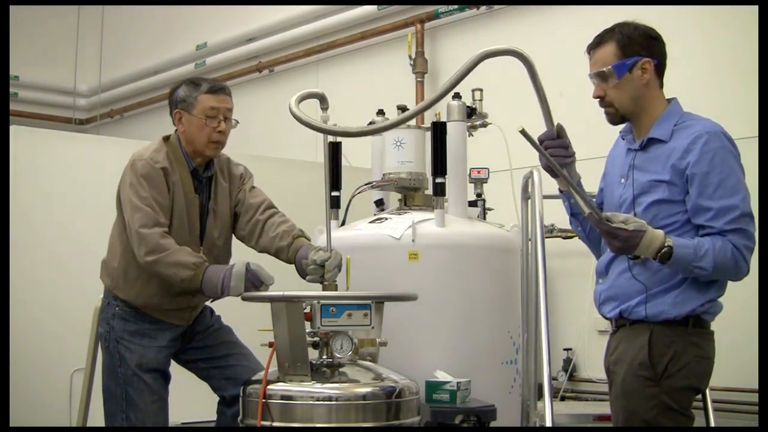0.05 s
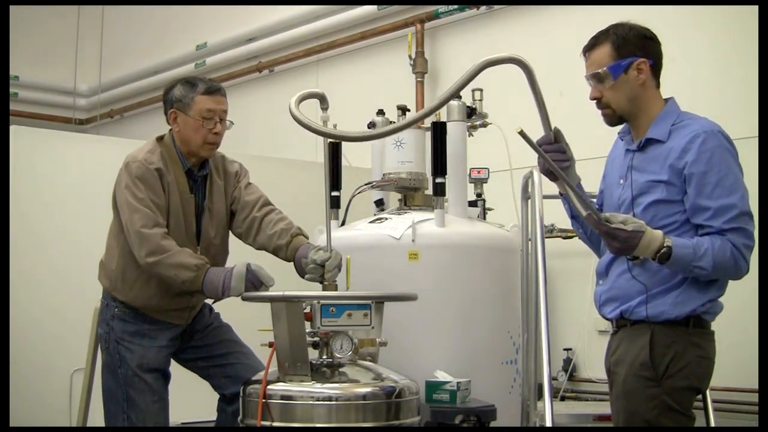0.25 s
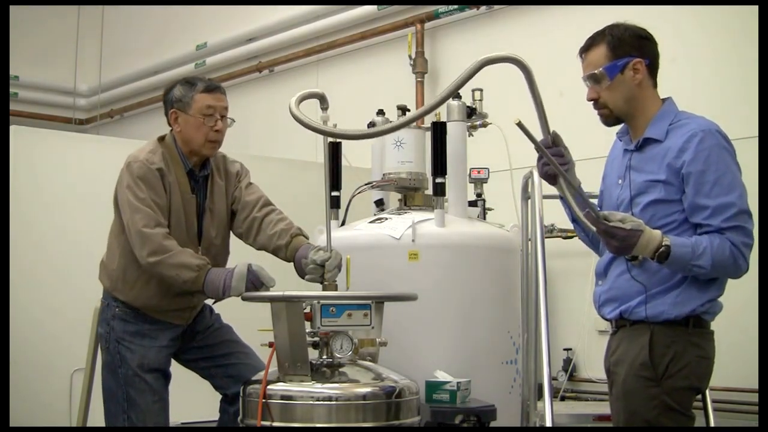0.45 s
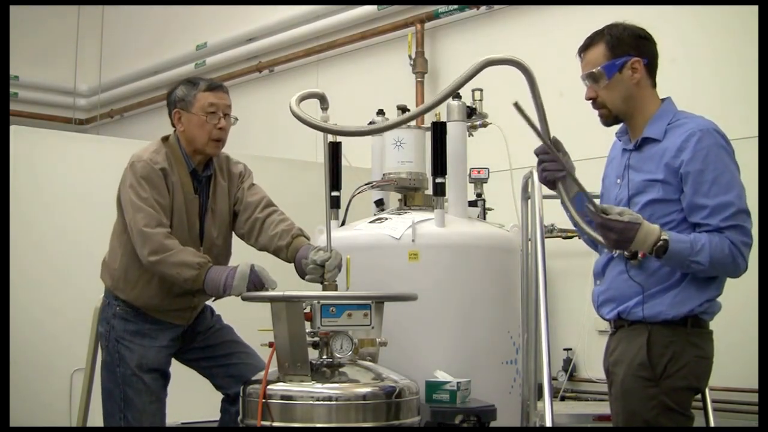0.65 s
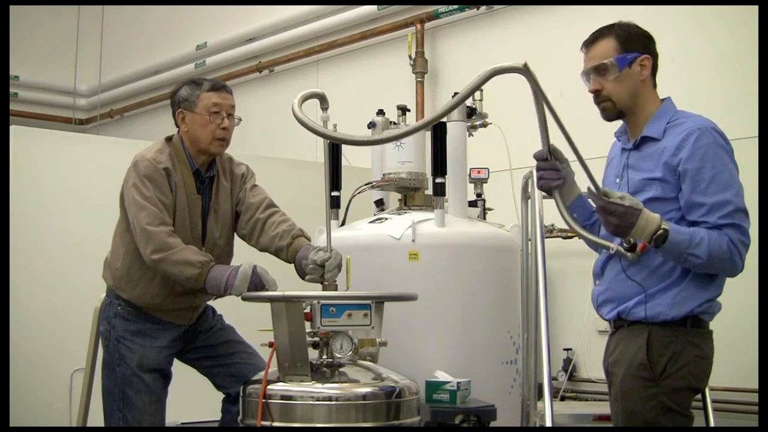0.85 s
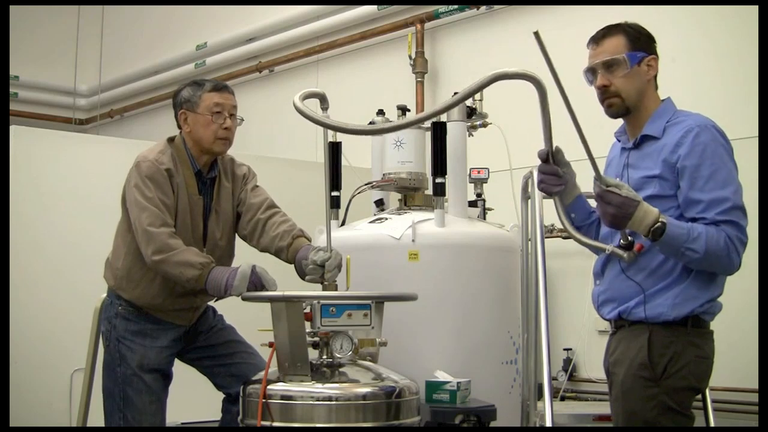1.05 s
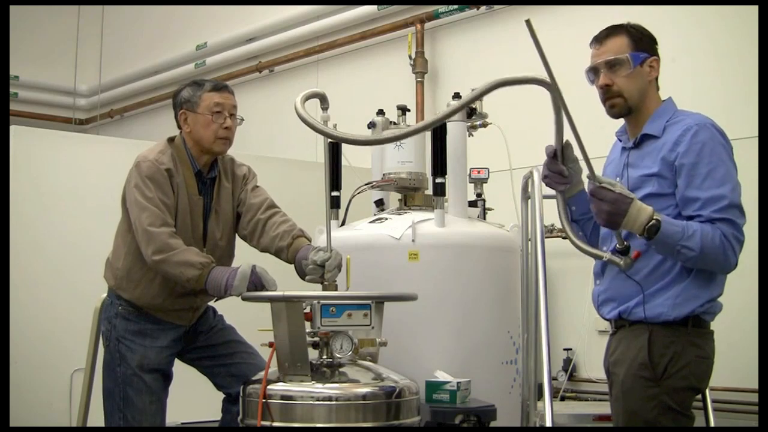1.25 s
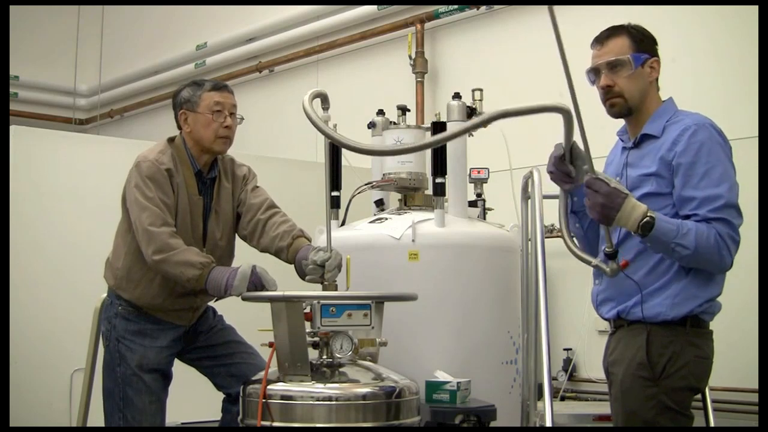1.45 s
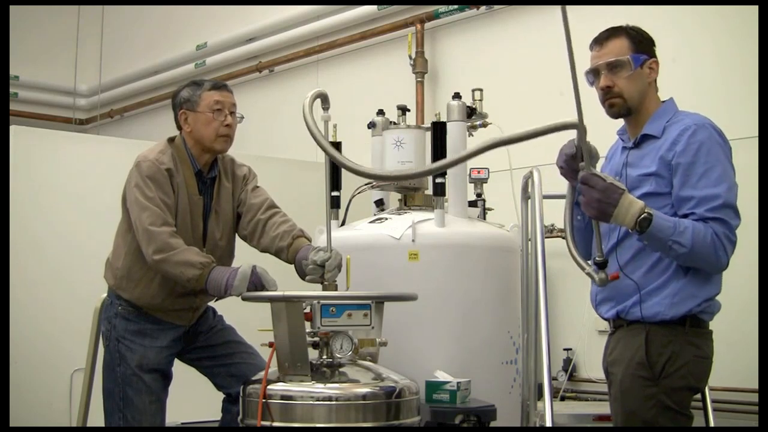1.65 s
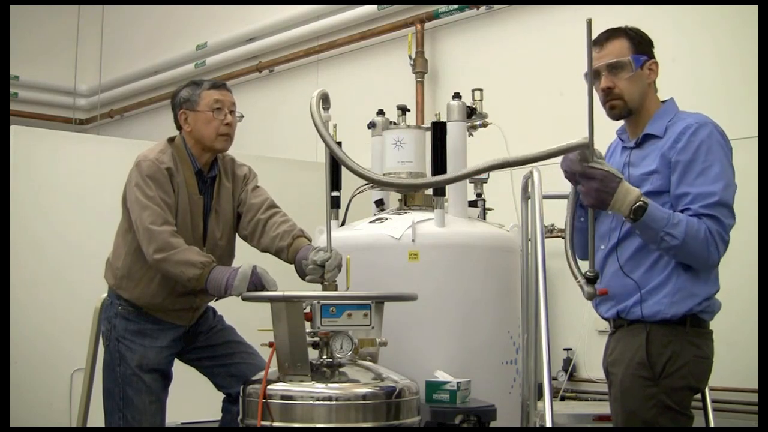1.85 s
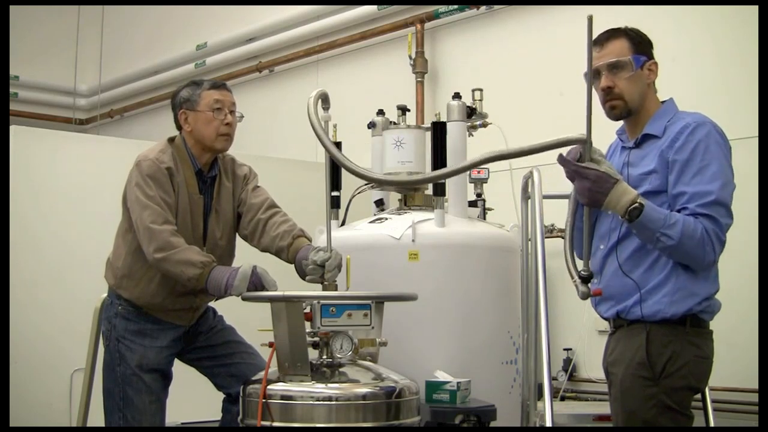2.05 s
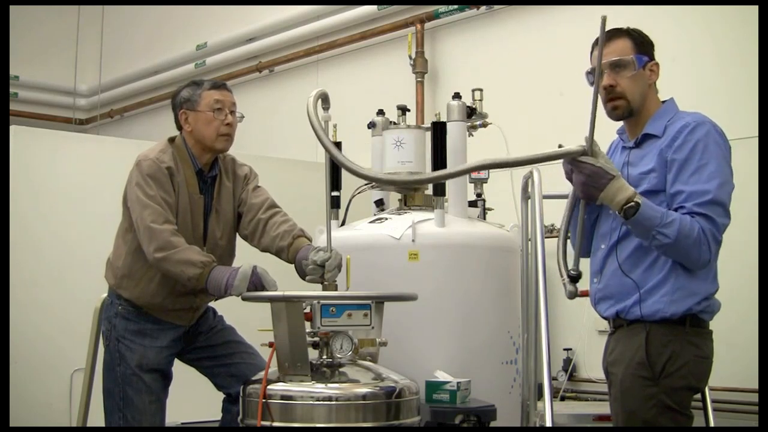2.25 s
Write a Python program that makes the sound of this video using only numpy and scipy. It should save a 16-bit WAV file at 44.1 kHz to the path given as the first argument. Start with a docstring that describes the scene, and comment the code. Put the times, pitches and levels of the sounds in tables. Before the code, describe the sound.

Cold gas hisses sharply from an open metal tube, growing louder and brighter over faint laboratory hum

```python
"""Cold helium hisses from the open end of a transfer line as it is swung upright in a laboratory.
The jet is noise in three broad arches parted by gaps; they slide upward as the flow grows and the tip turns.
A weak shoulder flickers beneath them, the flow flutters, and nearby surfaces return five delayed copies.
Behind lie ventilation (coloured noise) and machines (wavering tones). One microphone, the same in both channels."""
import sys
import numpy as np
from scipy import signal
from scipy.fft import rfft, irfft
from scipy.io import wavfile

SR = 44100
rng = np.random.default_rng(int(sys.argv[2]) if len(sys.argv) > 2 else 0)


def master(y):
    """Save y as 16-bit WAV."""
    cut = np.clip(np.atleast_2d(y).T, -1, 1)
    pcm = np.round(cut * 32767)  # scale
    wavfile.write(sys.argv[1], SR, pcm.astype(np.int16))


N = 100768
T = np.arange(N) / SR   # seconds

# Machine and mains hum. Each row: pitch in Hz, mean level in dB.
HUM_TONES = [(58.8, -68.5), (120, -69), (226, -70.5), (308.6, -58)]
HUM_WAVER_DB, HUM_WANDER_HZ = 1.1, 0.71

# Colour of the ventilation. Each row: frequency in Hz, relative density in dB per Hz.
AIR_COLOUR = [(20, -25), (42, -17), (70, -12.5), (110, -10), (165, -1), (225, 1.5), (275, -6.5),
              (320, -1.5), (400, -6), (750, -8), (1300, -14.5), (2000, -18.5), (2800, -23.5), (6000, -21),
              (15000, -53)]
# Ventilation at the microphone. Each row: time in seconds, level in dB.
AIR_LEVEL = [(0, -50.5), (1.8, -49), (2.0, -48.5), (2.28, -48)]

# Reflections off nearby surfaces. Each row: delay behind the direct sound at the start in seconds,
# the same at the end in seconds, level against the direct sound in dB.
REFLECTIONS = [(.0014, 0.0019, -17.5), (.0031, 0.0036, -17.5), (.0074, 0.0042, -16.5),
               (0.0136, 0.011, -17.5), (.023, 0.016, -11)]

# Edges of the two lower humps of the hiss. Each row: time in seconds, foot of the low hump in Hz,
# top of the low hump in Hz, foot of the middle hump in Hz.
HUMP_EDGES = [(0, 3620, 6430, 7060), (.45, 3650, 6350, 7020), (.65, 3734, 6310, 6880),
              (1.05, 3590, 6500, 6800), (1.25, 3660, 7060, 6920), (1.43, 3760, 7110, 7150),
              (1.7, 3800, 7260, 6900), (1.87, 3990, 7630, 7170), (2.1, 4370, 7650, 6830),
              (2.2, 3900, 7750, 7400), (2.28, 3760, 7560, 7920)]
# Narrow gap between the middle and the high hump. Each row: time in seconds, frequency in Hz.
HIGH_GAP = [(0, 11050), (.5, 11050), (1.15, 11350), (1.3, 11700), (1.43, 12350), (1.7, 12350), (1.9, 13600),
            (2.05, 13350), (2.28, 13300)]
HIGH_TOP_RATIO = 1.397   # top of the high hump, relative to the high gap
LEAN_DB_PER_HZ = 0.0025   # the middle hump leans toward the treble as the high gap rises

# Hump levels before trim and flutter. Each row: time in seconds, low in dB, middle in dB, high in dB.
HUMP_LEVELS = [(0.0, -45.5, -40, -52), (0.04, -47, -44, -53), (0.15, -44.5, -39, -49),
               (0.49, -38.5, -35.5, -44.5), (0.52, -44, -37.5, -43), (0.65, -37.5, -35, -43.5),
               (0.78, -42, -37.5, -43.5), (0.87, -39, -35, -41.5), (1.05, -36.5, -35.5, -45),
               (1.17, -37, -35.5, -42.5), (1.21, -35.5, -35, -46), (1.25, -36.5, -35.5, -38),
               (1.4, -35.5, -33.5, -44), (1.55, -36, -33.5, -42.5), (1.9, -33.5, -33.5, -50.5),
               (1.92, -32.5, -31, -48), (1.99, -33.5, -35.5, -52), (2.08, -32.5, -36, -50),
               (2.13, -37, -46, -66), (2.28, -36, -36.5, -52)]
# Shape of the low, middle and high hump. Each row: trim in dB, steepness of the flanks (an exponent),
# tilt from lower to upper edge in dB.
HUMP_SHAPES = [(0, 1.95, -9), (0, 1.56, -6), (1.5, 1.4, -18)]

# Weaker, narrow shoulder under the low hump. Each row: time in seconds, centre in Hz,
# level before flicker in dB.
SHOULDER = [(0, 3440, -72.5), (.7, 3440, -66.5), (.87, 3550, -62), (1.2, 3350, -62.5), (1.42, 3470, -63),
            (1.48, 3300, -59), (1.55, 3560, -55), (1.78, 3700, -66.5), (1.88, 3450, -59.5),
            (2.02, 3950, -55.5), (2.15, 4230, -57), (2.28, 4070, -47.5)]
SHOULDER_WIDTH_HZ, SHOULDER_FLICKER_DB, SHOULDER_FLICKER_PER_S = 890, 3, 9.8

FLUTTER_DB, FLUTTER_PER_S = 0.25, 24   # unsteadiness of the whole jet
SPUTTER_DB, SPUTTER_PER_S = 0.9, 310   # its fine grain
OWN_FLUTTER_DB, OWN_FLUTTER_PER_S = 0.83, 35   # each main hump on its own

CUTOFF_HZ = 15750


def from_db(db):
    """Decibels to amplitude gain."""
    return 10 ** (np.asarray(db) / 20)


def rms_one(x):
    """Scale to an rms of 1."""
    return x / np.sqrt(np.mean(x ** 2) + 1e-20)


def in_time(rows, t):
    """The columns of a time table, drawn as straight lines between its rows, at times t."""
    seconds, *columns = np.transpose(rows)
    return [np.interp(t, seconds, column) for column in columns]


def drift(rate):
    """Smooth random wander with a spread of about 1: noise through two equal low-pass poles at rate (Hz)."""
    step = 20   # samples between points of the slow curve
    pole = np.exp(-2 * np.pi * rate * step / SR)
    noise = rng.standard_normal(N // step + 4002)
    slow = signal.lfilter([1], [1, -2 * pole, pole * pole], noise)[4000:]   # settled part only
    return np.interp(np.arange(N) / step, np.arange(len(slow)), rms_one(slow))


def machines():
    """Hum of mains and machines: sine tones that waver gently in level and pitch."""
    hum = np.zeros(N)
    for hz, db in HUM_TONES:
        gain = np.sqrt(2) * from_db(db + HUM_WAVER_DB * drift(4.2))   # sqrt(2): the level is an rms
        pitch = hz + HUM_WANDER_HZ * drift(2.3)
        cycles = rng.random() + np.cumsum(pitch) / SR
        hum += gain * np.sin(2 * np.pi * cycles)
    return hum


def ventilation():
    """Low rush of air: noise with a fixed colour, its level rising slightly."""
    hz, db = np.transpose(AIR_COLOUR)
    bins_hz = np.fft.rfftfreq(N, 1 / SR) + 1e-9
    colour = from_db(np.interp(np.log(bins_hz), np.log(hz), db))
    rush = irfft(rfft(rng.standard_normal(N)) * colour, N)
    level_db, = in_time(AIR_LEVEL, T)
    return from_db(level_db) * rms_one(rush)


def laboratory(direct):
    """Direct sound plus reflections whose paths change as the tip moves, scaled to keep overall power."""
    oversampling = 4   # a fine grid keeps the gliding delays clean
    fine = signal.resample_poly(direct, oversampling, 1)
    fine_t = np.arange(len(fine)) / (oversampling * SR)
    total, power = direct, 1
    for first, last, db in REFLECTIONS:
        delay = np.linspace(first, last, N)
        total = total + from_db(db) * np.interp(T - delay, fine_t, fine, left=0)
        power += from_db(db) ** 2
    return total / np.sqrt(power)


def hump(low, high, steepness, tilt_db, size=512):
    """Turbulence as noise in an arch-shaped band between two moving edges (Hz); rms 1."""
    frames = dict(nperseg=size, noverlap=size - size // 4)
    hz, t, noise = signal.stft(rng.standard_normal(N), SR, **frames)
    low, high, tilt_db = (np.interp(t, T, np.broadcast_to(curve, N)) for curve in (low, high, tilt_db))
    across = np.clip((hz[:, None] - low) / (high - low), 0, 1)   # 0 at the lower edge, 1 at the upper
    arch = (np.abs(np.sin(np.pi * across)) + 1e-9) ** steepness
    arch = arch * from_db(tilt_db * across)
    arch = arch / np.sqrt(np.mean(arch ** 2, axis=0))   # equal power in every frame
    return rms_one(signal.istft(noise * arch, SR, **frames)[1][:N])


def shoulder():
    """Flickering narrow band of turbulence around the foot of the low hump."""
    centre, level_db = in_time(SHOULDER, T)
    half = SHOULDER_WIDTH_HZ / 2
    flicker_db = SHOULDER_FLICKER_DB * drift(SHOULDER_FLICKER_PER_S)
    return from_db(level_db + flicker_db) * hump(centre - half, centre + half, steepness=0.8, tilt_db=1)


def jet():
    """Escaping gas: three humps and the shoulder flutter together, each hump also a little on its own."""
    low_foot, low_top, middle_foot = in_time(HUMP_EDGES, T)
    high_gap, = in_time(HIGH_GAP, T)
    lean = LEAN_DB_PER_HZ * (high_gap - high_gap[0])
    # lower edge, upper edge, added tilt in dB
    bands = [(low_foot, low_top, 0), (middle_foot, high_gap, lean), (high_gap, high_gap * HIGH_TOP_RATIO, 0)]
    hiss = shoulder()
    for band, level_db, shape in zip(bands, in_time(HUMP_LEVELS, T), HUMP_SHAPES):
        low, high, lean_db = band
        trim_db, steepness, tilt_db = shape
        own_db = OWN_FLUTTER_DB * drift(OWN_FLUTTER_PER_S)
        hiss = hiss + from_db(level_db + trim_db + own_db) * hump(low, high, steepness, tilt_db + lean_db)
    shared_db = FLUTTER_DB * drift(FLUTTER_PER_S) + SPUTTER_DB * drift(SPUTTER_PER_S)
    return hiss * from_db(shared_db)


def scene():
    """The background and the jet in its room, the same in both channels."""
    mono = machines() + ventilation() + laboratory(jet())
    return np.array([mono, mono])


def record(dry):
    """The treble ends steeply at the cutoff: an elliptic low-pass with 0.1 dB ripple, 80 dB down above."""
    return signal.sosfilt(signal.ellip(12, 0.1, 80, CUTOFF_HZ, fs=SR, output="sos"), dry)


dry = scene()
out = record(dry)
master(out)
```